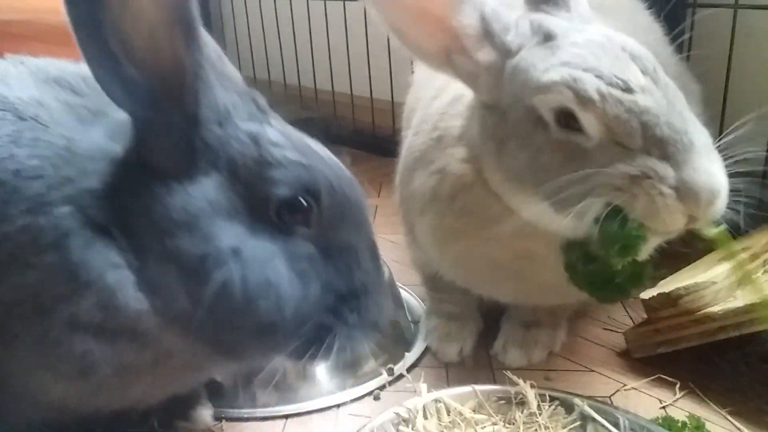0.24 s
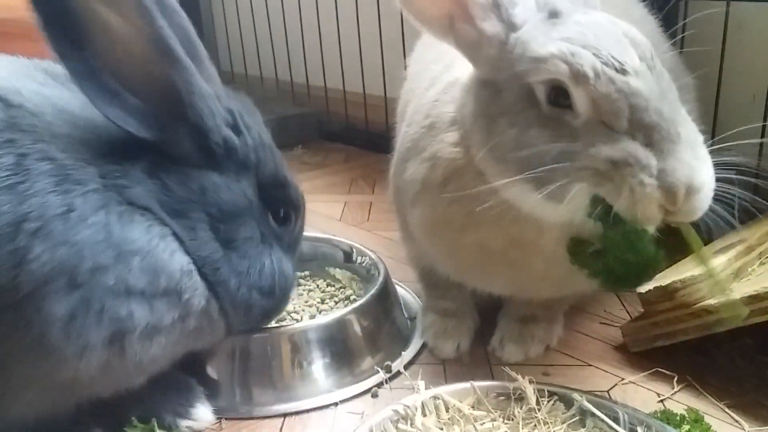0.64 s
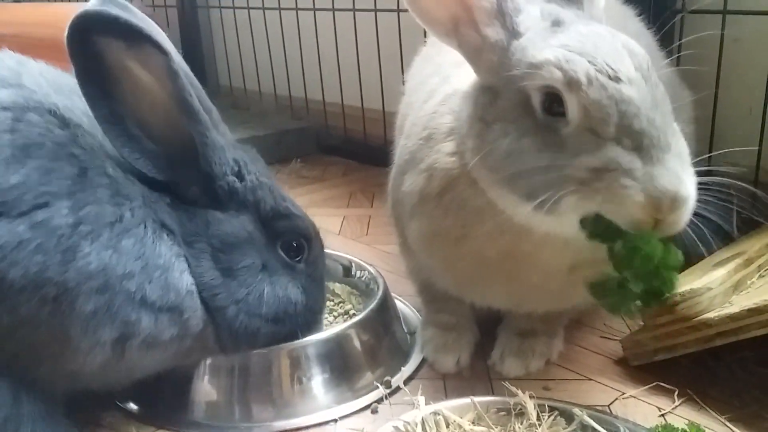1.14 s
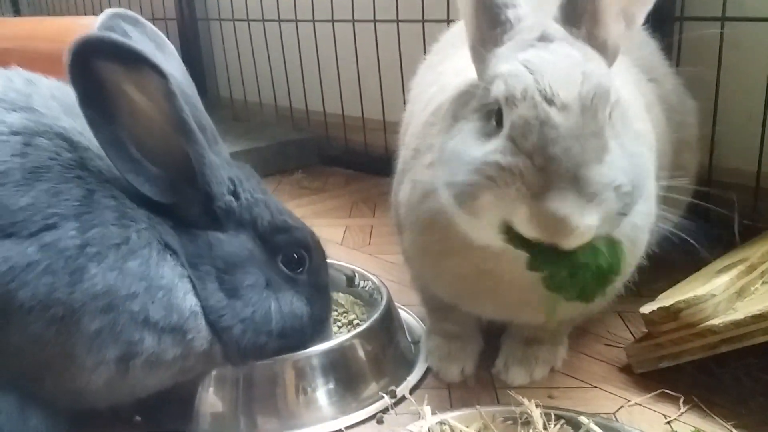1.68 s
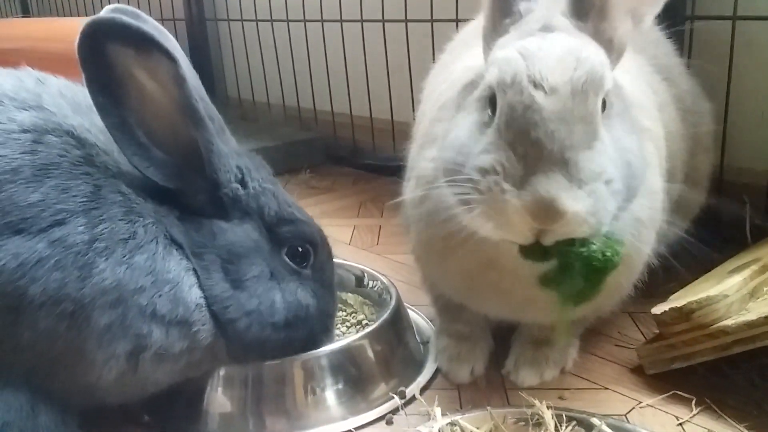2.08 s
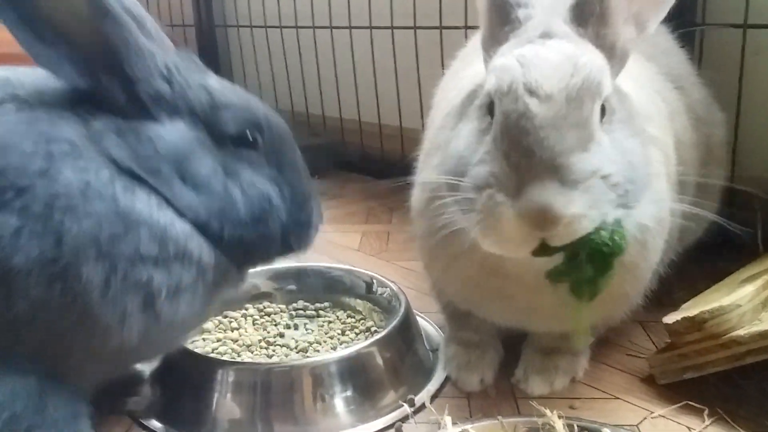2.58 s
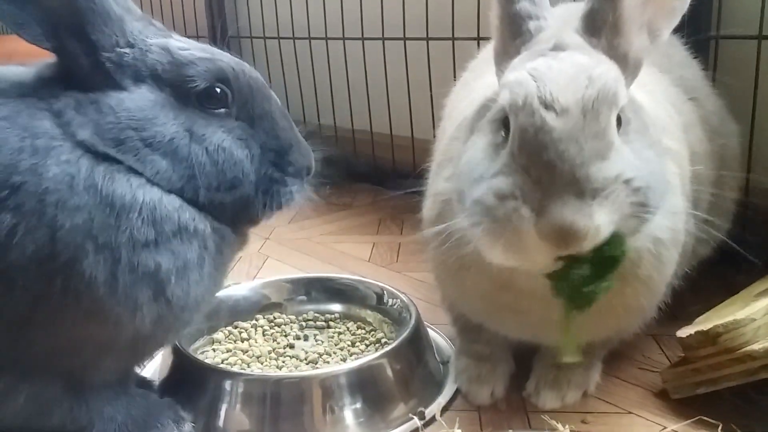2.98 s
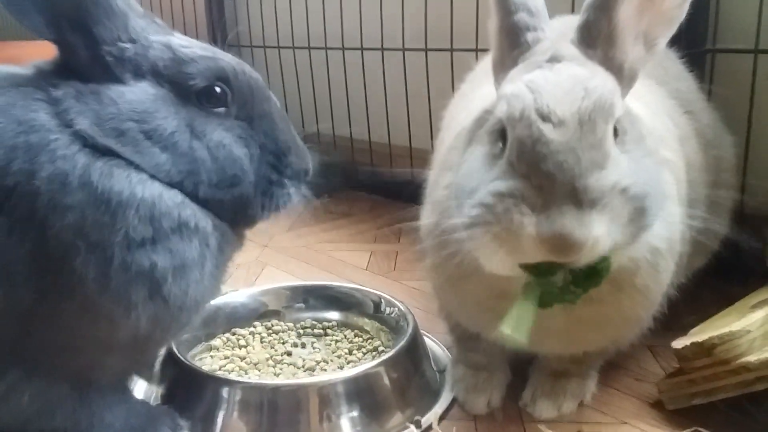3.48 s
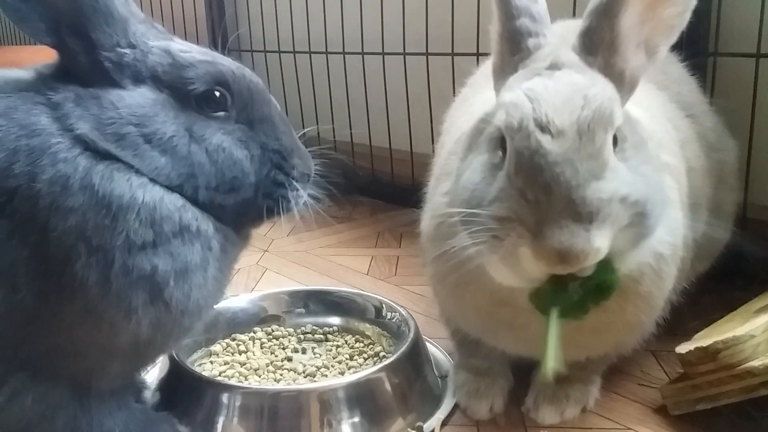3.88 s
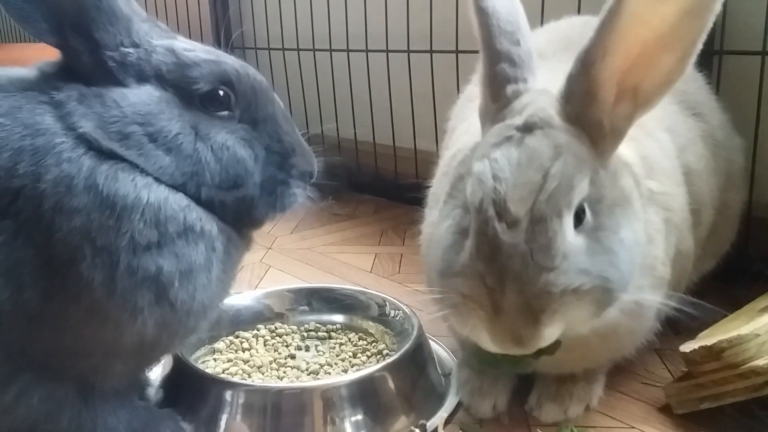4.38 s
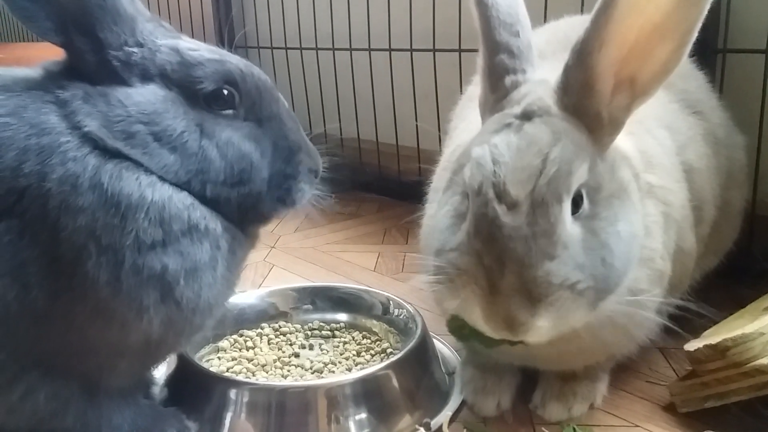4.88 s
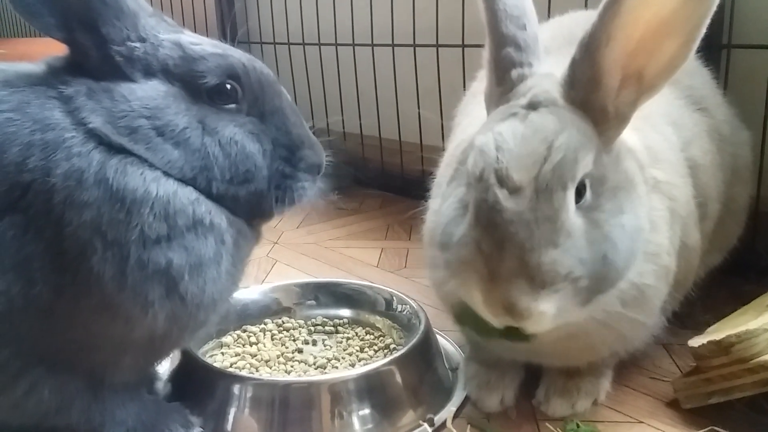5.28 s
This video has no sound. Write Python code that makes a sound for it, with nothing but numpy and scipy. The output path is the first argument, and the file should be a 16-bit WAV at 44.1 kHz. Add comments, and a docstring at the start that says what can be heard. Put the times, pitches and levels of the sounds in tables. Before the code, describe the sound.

Two rabbits chew leafy greens and pellets close to the microphone, dull low thumps and muffled crunches over soft grinding in a quiet pen.

```python
"""Two rabbits chew parsley and pellets close to a muffled microphone in a quiet pen.
Each bite is a dull thump, a low-passed impulse dispersed into a chirp that falls in pitch;
a run of tiny cracks gives its crunch, and shaped noise a low, muffled tail with a faint rustle above.
Soft nibbling and grinding, made of smaller jolts, go on between.
Under them lie a low room rumble and faint hiss, both shaped noise, and a thin electronic whine."""
import sys
import numpy as np
from scipy import signal
from scipy.fft import rfft, irfft
from scipy.io import wavfile
from scipy.ndimage import uniform_filter1d

SR = 44100
rng = np.random.default_rng(int(sys.argv[2]) if len(sys.argv) > 2 else 0)


def to_wav(sig):
    """Store sig (one row per channel, or 1-D mono) as 16-bit WAV at the path in sys.argv[1].

    Samples outside -1..1 are clipped; the rate is SR.
    """
    pcm = np.clip(np.atleast_2d(sig), -1, 1) * 32767
    pcm = np.round(pcm).astype(np.int16)
    wavfile.write(sys.argv[1], SR, pcm.T)  # frames by channels


N = 244307  # length in samples


def amp(db):
    """A gain is ten to the power of its decibels over twenty."""
    return 10 ** (np.asarray(db) / 20)


def unit(x):
    """Normalization by the root mean square gives every signal the same power."""
    return x / np.sqrt(np.mean(x ** 2) + 1e-20)


def read(points, hz):
    """Interpolation along logarithmic frequency reads a spectrum in dB."""
    point_hz, db = np.transpose(points)
    return np.interp(np.log(hz + 1), np.log(point_hz + 1), db)


def add(mix, s, sound):
    """Superposition: a sound starting at s seconds sums with what is there."""
    part = mix[max(round(s * SR), 0):][:len(sound)]
    part += sound[:len(part)]


def noise(points):
    """Spectral shaping: filtered white noise is steady and takes the given colour."""
    hz = np.fft.rfftfreq(N, 1 / SR)
    white = rfft(rng.standard_normal(N))
    return unit(irfft(white * amp(read(points, hz)), N))


# Spectrum of the room rumble. Each row: frequency in Hz, relative density in dB per Hz.
RUMBLE_SPECTRUM = [(10, -40.5), (25, -22.5), (45, -8.5), (62, 1.5), (95, -5.5), (130, -6.5), (180, -21),
                   (260, -27.5), (400, -33), (800, -64.5)]


def rumble(level_db=-60.5):
    """Stationary random noise, strongest near 60 Hz, forms the sound of the room."""
    return amp(level_db) * noise(RUMBLE_SPECTRUM)


# Spectrum of the microphone hiss. Each row: frequency in Hz, relative density in dB per Hz.
HISS_SPECTRUM = [(20, -5.5), (300, 2), (700, -0.5), (1500, -2), (4000, -5), (8000, -6.5), (11500, -6.5),
                 (14400, -5), (14650, 4.5), (16000, -1.5)]


def hiss(level_db=-76):
    """Random noise of the microphone spreads over the whole audible band."""
    return amp(level_db) * noise(HISS_SPECTRUM)


def whine(pitch_hz=15024, drift_hz=5, level_db=-73.7):
    """Frequency modulation: a thin electronic sine drifts slowly by a few hertz."""
    drift = unit(uniform_filter1d(rng.standard_normal(N), SR // 2, mode="wrap"))
    hz = pitch_hz + drift_hz * (drift - drift.mean())
    return amp(level_db) * unit(np.sin(2 * np.pi * np.cumsum(hz) / SR))


TRAVEL_CYCLES = 0.243  # delay of a thump at its own pitch, in cycles


def thump(pitch_hz, hardness_db, size=8192):
    """Dispersion spreads one jolt of the teeth, held to a narrow low band, into a short falling chirp."""
    # frequency and band edges are in multiples of the pitch, hardness in dB per octave
    f = np.fft.rfftfreq(size, 1 / SR) / pitch_hz + 0.0011
    bass_cut = (0.87 / f) ** (2 * 4.93)
    top_cut = (f / 0.98) ** (2 * 3.354)
    passed = 1 / np.sqrt((1 + bass_cut) * (1 + top_cut))
    muffled = passed / np.sqrt(1 + (f / 4.1) ** 8)
    tilt = amp(hardness_db * np.log2(np.clip(f, 0.5, 3)))
    log_gain = np.log(np.maximum(muffled, 2e-6) * tilt)
    # minimum phase: the Hilbert transform of the log gain makes the response causal
    mirrored = np.r_[log_gain, log_gain[-2:0:-1]]
    causal = np.exp(np.conj(signal.hilbert(mirrored)))[:len(f)]
    # as with bending waves in a board, speed grows with the root of frequency: the highs arrive first
    lag = 4 * np.pi * TRAVEL_CYCLES * np.sqrt(f)
    wave = irfft(causal * np.exp(-1j * lag))[:size // 2]
    return wave / abs(wave).max()


# How hard the molars grind between bites. Each row: time in seconds, relative level in dB.
GRIND_LEVELS = [(0.0, -51.5), (0.14, -49.5), (0.31, -52), (0.55, -53.5), (0.83, -58.5), (1.28, -50),
                (1.67, -55.5), (1.87, -51.5), (2.08, -58), (2.39, -57.5), (2.52, -53.5), (2.98, -51),
                (3.26, -55.5), (3.66, -57), (4.06, -66.5), (4.3, -54.5), (4.57, -63), (5.54, -58)]


def grind_db(s):
    """Linear interpolation gives the grinding effort at any moment."""
    return np.interp(s, *np.transpose(GRIND_LEVELS))


def grinding(jolts_per_s=170, spread_db=3, pitch_hz=108, hardness_db=-8, level_db=-2.5,
             strokes_per_s=9, stroke_db=3.5, count=8):
    """Shot noise: many tiny jolts as the food is crushed, in waves with the strokes of two jaws."""
    out = np.zeros(N)
    for _ in range(count):  # each share of the jolts has its own pitch
        struck = rng.random(N) < jolts_per_s / count / SR
        jolts = struck * rng.choice([-1, 1], N)
        sizes = amp(spread_db * np.clip(rng.standard_normal(N), -2, 1))
        jolt = thump(pitch_hz * (1 + 0.19 * rng.uniform(-1, 1)), hardness_db)
        out += signal.oaconvolve(jolts * sizes, jolt)[:N]
    wander = unit(uniform_filter1d(rng.standard_normal(N), SR // 8))
    pace = strokes_per_s * (1 + 0.3 * wander)
    strokes = amp(stroke_db * np.sin(2 * np.pi * np.cumsum(pace) / SR))
    return unit(out * strokes) * amp(level_db + grind_db(np.arange(N) / SR))


# Colour of the crunch. Each row: frequency in Hz, relative gain in dB.
CRUNCH_COLOUR = [(60, -20), (200, 6.5), (350, 5), (500, 6), (610, 0), (690, 1), (850, -8.5), (960, -22.5),
                 (1400, -24.5), (2200, -38), (5000, -54), (9000, -66)]


def crunch(db, length_s=0.023, early=0.6, level_db=5.0, crisp_db=-55, dulling=0.35, knee_hz=450,
           count=12, size=4096):
    """Brittle fracture: fibres give way in a quick run of tiny cracks, the largest early."""
    place = (np.arange(count) + rng.random(count)) / count  # 0 to 1 along the run
    cracks = np.zeros(size)
    strength = rng.standard_normal(count) * np.sin(np.pi * place ** early) ** 2
    cracks[(place * length_s * SR).astype(int)] = strength
    hz = np.fft.rfftfreq(size, 1 / SR)
    # a gentle crunch is duller than a hard one
    treble = np.clip(np.log2((hz + 1) / knee_hz), 0, 1)
    tilt_db = dulling * np.clip(db - crisp_db, -20, 2) * treble
    colour = amp(read(CRUNCH_COLOUR, hz) + tilt_db)
    wave = irfft(rfft(cracks) * colour)[:size // 2]
    wave = wave * signal.windows.tukey(size // 2, 0.06)
    return amp(db + level_db) * unit(wave)


def nibbles(per_s=11, unevenness=0.3, above_grind_db=9, spread_db=2, pitch_hz=108, hardness_db=-8,
            crunch_db=-52, count=64):
    """A jittered pulse train: soft chews of two jaws stand out above the grinding, rising and falling with it."""
    out = np.zeros(N)
    for k, (late, strong, hard) in enumerate(rng.standard_normal((count, 3))):
        s = (k + 0.5 + unevenness * late) / per_s
        db = grind_db(s) + above_grind_db + spread_db * strong
        add(out, s, amp(db) * thump(pitch_hz, hardness_db + spread_db * hard))
        add(out, s, crunch(db + crunch_db))
    return out


BITE_PITCH_HZ, FIRM_BITE_DB = 102.46, -15  # pitch of a firm bite of zero hardness, and its peak level
OCTAVES_PER_HARDNESS, OCTAVES_PER_DB = -0.031, 0.0125


def bite_pitch(db, hardness_db):
    """Pitch follows force: a hard bite reaches deeper, and a weak one sounds lower than a firm one."""
    octaves = OCTAVES_PER_HARDNESS * hardness_db + OCTAVES_PER_DB * (db - FIRM_BITE_DB)
    return BITE_PITCH_HZ * 2 ** octaves


# The bites that stand out. Each row: start in seconds, peak level of the thump in dB,
# hardness in dB per octave, level of the crunch in dB before its common gain.
BITE_EVENTS = [(0.067, -22.6, 5.5, -74), (0.1182, -17, -5.5, -85.5), (0.1356, -29.5, 4.5, -85),
               (0.2169, -31, -1, -80.5), (0.3305, -34.5, -5.5, -92), (0.4362, -41.5, -9.5, -96),
               (0.5372, -36.5, -10.5, -87), (0.9781, -16.5, -6, -70), (1.0769, -13.5, 6, -61.5),
               (1.2077, -38.5, -4, -96), (1.269, -42.5, 1, -92), (1.4021, -26.5, -5.5, -80),
               (1.463, -37.8, -0.5, -97), (1.6095, -13, -0.5, -59.5), (1.6342, -20, 9.5, -72),
               (1.722, -36.3, -3, -96), (1.8322, -38.5, -2, -94), (1.8925, -34, 3, -85),
               (1.9353, -30, -8, -78), (1.9538, -14, 0.5, -62), (2.3862, -12.5, 4, -66.5),
               (2.4383, -36.5, -12.5, -89), (2.464, -32.5, 1, -81), (2.5447, -38, 2, -78.5),
               (2.6227, -34, 1.5, -98), (2.6598, -35.5, 6.5, -95), (2.7896, -32, -8, -89.5),
               (2.8156, -13, 5.5, -56), (2.8754, -38.5, 14, -79.5), (3.001, -36, -0.5, -89),
               (3.0298, -15.5, 5.5, -63), (3.0586, -23.5, 11.5, -71), (3.3677, -41, -7, -92),
               (3.5142, -14.9, -2.5, -64.5), (3.6217, -32, -10.5, -91.5), (3.6424, -17.5, 6.5, -72),
               (3.8331, -32.5, -11.5, -90), (4.1706, -32.5, -4.5, -91), (4.1845, -29.5, -4, -87.5),
               (4.308, -19.5, -6.5, -75), (4.4382, -36.5, -6.5, -94), (4.752, -17, -7, -73.5),
               (4.9283, -22, -0.5, -72.5), (4.9687, -18, 0, -74), (5.1133, -34, -8, -82),
               (5.3874, -31.5, -6, -80.5)]


def bites():
    """Impact and fracture together: each bite is a thump of the teeth and a crunch of the food."""
    out = np.zeros(N)
    for s, db, hardness_db, crunch_db in BITE_EVENTS:
        add(out, s, -amp(db) * thump(bite_pitch(db, hardness_db), hardness_db))
        add(out, s, crunch(crunch_db))
    return out


# Colour of the noisy tail after each bite, strongest near 300 Hz.
# Each row: frequency in Hz, relative density in dB per Hz.
TAIL_SPECTRUM = [(60, -10.5), (300, 17), (600, 2.5), (1000, -7), (2500, -7), (5000, -9), (10000, -14)]


def bite_tails(level_db=-71, follow=0.6, attack_s=0.0067, t60=0.22):
    """Exponential decay: a low, muffled noisy tail follows each bite, with a faint rustle above."""
    t = np.arange(SR // 2) / SR
    envelope = np.zeros(N)
    for s, db, _, _ in BITE_EVENTS:
        decay_db = -60 * t / t60
        decay = amp(follow * (db - FIRM_BITE_DB) + decay_db)
        add(envelope, s, np.minimum(t / attack_s, 1) * decay)
    return amp(level_db) * envelope * noise(TAIL_SPECTRUM)


def shudder(x, level_db=-25, t60=0.064, delay_s=0.016):
    """Diffuse reflection: weak scattered returns of the chewing from the floor and pen."""
    t = np.arange(SR // 4) / SR
    tail = rng.standard_normal(len(t)) * amp(-60 * t / t60) * (t > delay_s)
    return amp(level_db) * signal.oaconvolve(x, tail / np.linalg.norm(tail))[:N]


def scene():
    """Superposition of the chewing, its reflections and the quiet room."""
    chewing = bites() + nibbles()
    return (chewing + shudder(chewing) + grinding() + bite_tails() + rumble())[None]


def record(dry, edge_hz=15740):
    """Band limiting: the electronics add hiss and whine, then a steep low-pass ends the spectrum."""
    wet = dry + hiss() + whine()
    lowpass = signal.firwin(2047, edge_hz, window=("kaiser", 9), fs=SR)
    return signal.oaconvolve(wet, lowpass[None], "same")


dry = scene()
out = record(dry)
to_wav(out)
```